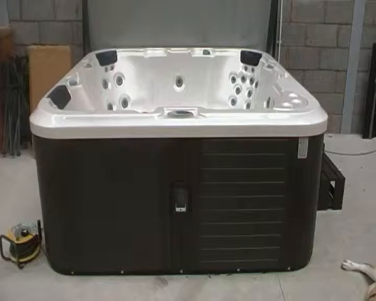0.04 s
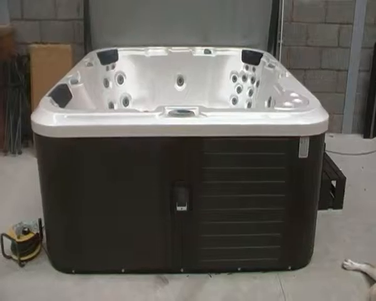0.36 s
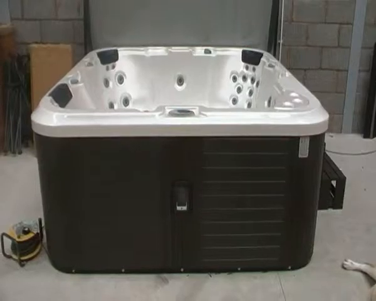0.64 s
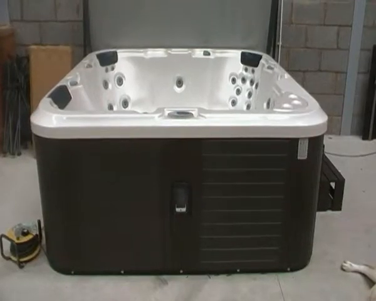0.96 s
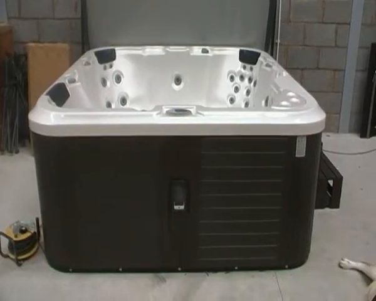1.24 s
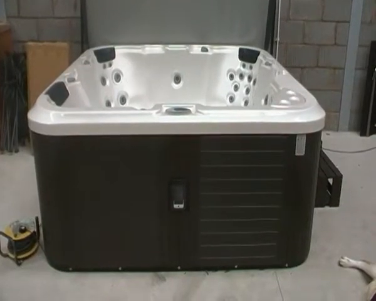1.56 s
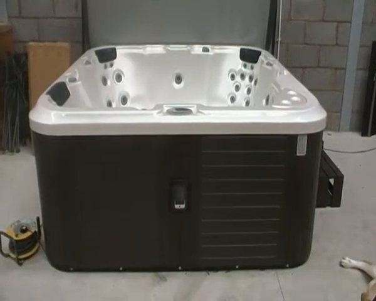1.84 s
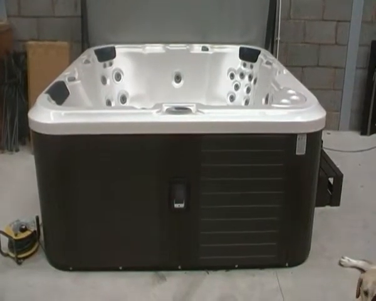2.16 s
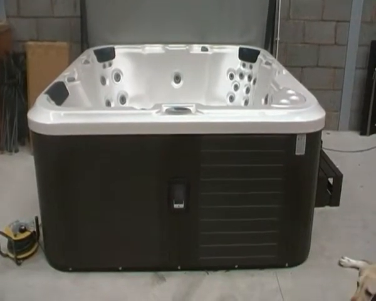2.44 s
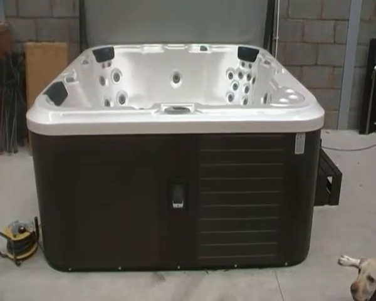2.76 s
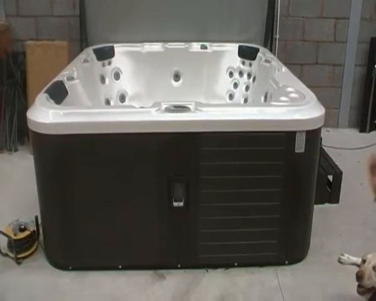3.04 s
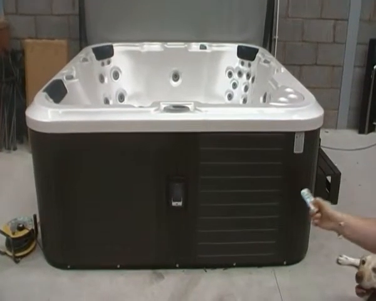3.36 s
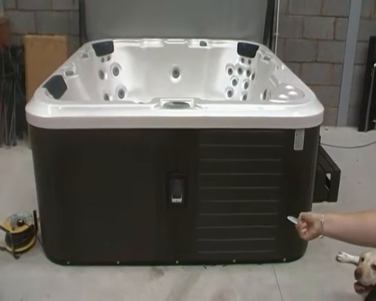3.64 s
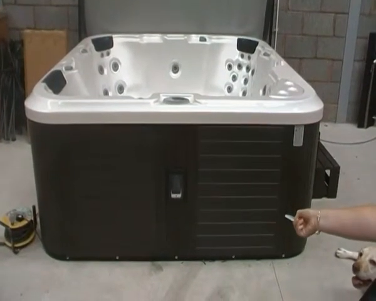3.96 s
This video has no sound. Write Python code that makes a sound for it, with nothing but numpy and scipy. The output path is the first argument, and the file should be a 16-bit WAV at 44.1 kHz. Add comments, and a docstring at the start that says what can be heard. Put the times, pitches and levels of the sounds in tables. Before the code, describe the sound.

Quiet workshop room noise starts just after the beginning and holds steady: airy hiss, a deep wavering rumble and a faint hum. A soft low bump comes at 0.5 seconds and a slight swell around 1.3. Faint ticks, light knocks and scuffs fall between 2 and 3 seconds. At about 3.4 and 3.5 seconds a small plastic object clicks twice, close by, over soft low bumps.

```python
"""A quiet workshop: moving air, a deep building rumble and a faint hum of fan and mains,
under steady microphone hiss. The sound cuts in just after the start. The low middle swells once;
soft bumps, light ringing knocks, dry ticks and scuffs come from the room. Near the end a small
plastic thing in the hand clicks twice, close by, each click a cluster of hard contacts."""
import sys
import numpy as np
from scipy import signal
from scipy.fft import rfft, irfft
from scipy.io import wavfile
from scipy.ndimage import uniform_filter1d

SR = 44100
rng = np.random.default_rng(int(sys.argv[2]) if len(sys.argv) > 2 else 0)


def log_audio(samples):
    """Write samples as a 16-bit WAV file to the path given in sys.argv[1]."""
    # one column per channel
    frames = np.atleast_2d(samples).T
    # limit to full scale, then quantise
    limited = np.clip(frames, -1, 1)
    pcm = np.round(limited * 32767).astype(np.int16)
    wavfile.write(sys.argv[1], SR, pcm)


N = 176400
TIME_S = np.arange(N) / SR
BIN_HZ = np.arange(N // 2 + 1) * SR / N


def gain(db):
    """Decibels to gain."""
    return 10 ** (np.asarray(db) / 20)


def unit_rms(x):
    """Scale to rms 1."""
    return x / np.sqrt(np.mean(x ** 2))


def wander(rate_hz):
    """Random steps, smoothed twice; spread near 1."""
    hold = int(SR / rate_hz)
    steps = np.repeat(rng.standard_normal(N // hold + 1), hold)
    return 1.31 * uniform_filter1d(uniform_filter1d(steps, hold), hold)[:N]


def shaped_noise(spectrum):
    """Noise of rms 1 shaped by (Hz, dB) points."""
    hz, db = np.array(spectrum).T
    bin_db = np.interp(np.log(np.maximum(BIN_HZ, 1)), np.log(hz), db)
    return unit_rms(irfft(rfft(rng.standard_normal(N)) * gain(bin_db), N))


def bandpass(x, low_hz, high_hz):
    """Butterworth band filter."""
    return signal.sosfilt(signal.butter(2, [low_hz, high_hz], "band", fs=SR, output="sos"), x)


def stereo(mid, side, side_db):
    """Left and right from mid and side."""
    return mid + gain(side_db) * side * np.array([[1], [-1]])


def pan_left(x, lead_db):
    """Tilt the balance to the left."""
    return x * gain([[lead_db / 2], [-lead_db / 2]])


def delay_left(x, lag_s):
    """Sound from the right reaches the left microphone late."""
    left, right = x * np.ones((2, 1))
    return np.array([irfft(rfft(left) * np.exp(-2j * np.pi * BIN_HZ * lag_s), N), right])


def burst(start_s, attack_s, decay_s, low_hz, high_hz, side_db):
    """Stereo noise band: linear rise, exponential decay."""
    age_s = TIME_S - start_s
    envelope = np.clip(age_s / attack_s, 0, 1) * np.exp(-np.maximum(age_s - attack_s, 0) / decay_s)
    mid, side = (unit_rms(bandpass(rng.standard_normal(N), low_hz, high_hz)) for _ in range(2))
    return envelope * stereo(mid, side, side_db)


def room(x, wet_db, t60_s=.3):
    """Add the short diffuse tail of the block walls."""
    tail = rng.standard_normal((2, SR)) * np.exp(-np.log(1000) * TIME_S[:SR] / t60_s)
    tail /= np.sqrt(np.sum(tail ** 2, axis=1, keepdims=True))
    return x + gain(wet_db) * signal.fftconvolve(x, tail, axes=1)[:, :N]


# Each row: frequency in Hz, relative density in dB.
AIR_SPECTRUM = [(75, -1.5), (100, -3), (125, -3), (175, -8), (240, -6.5), (360, -11.5), (470, -14),
                (600, -15), (740, -14), (900, -17), (1110, -16), (1400, -24), (2100, -27.5), (4000, -35),
                (9000, -55), (12300, -52), (13000, -85)]


def air(level_db=-48, waver_db=.5):
    """Moving room air, wavering slightly."""
    flow = stereo(shaped_noise(AIR_SPECTRUM), shaped_noise(AIR_SPECTRUM), side_db=-6)
    return gain(level_db + waver_db * wander(rate_hz=5.12)) * flow


# Each row: frequency in Hz, relative density in dB.
RUMBLE_SPECTRUM = [(6, -18.5), (14, 1.5), (23, -10), (32, 0), (41, -7), (60, -8.5), (75, -13.5), (110, -33),
                   (250, -56), (2000, -92)]
# Each row: time in seconds, level in dB.
RUMBLE_ENVELOPE = [(.12, -47), (.4, -40.5), (.54, -38.5), (.72, -42), (1.1, -40.5), (1.5, -42),
                   (2.05, -42.5), (2.3, -38.5), (2.65, -42), (2.85, -46.5), (3.1, -38), (3.27, -47.5),
                   (3.45, -39.5), (3.62, -37.5), (3.72, -46), (4, -40)]


def rumble():
    """Deep building rumble that swells and sinks, slightly left."""
    level_db = np.interp(TIME_S, *np.array(RUMBLE_ENVELOPE).T)
    deep = stereo(shaped_noise(RUMBLE_SPECTRUM), shaped_noise(RUMBLE_SPECTRUM), side_db=-6)
    return pan_left(gain(level_db) * deep, lead_db=2)


# Each row: frequency in Hz, level in dB.
HUM_TONES = [(100, -59), (200, -64.5), (409.2, -68.5), (534, -70.5), (818.3, -69), (1064, -75), (7800, -84)]


def hum(drift_ratio=.0012, waver_db=1.7):
    """Mains and fan tones, each drifting in pitch and level."""
    def tone(hz):
        cycles = np.cumsum(hz * (1 + drift_ratio * wander(rate_hz=5.98))) / SR + rng.random()
        return unit_rms(np.sin(2 * np.pi * cycles) * gain(waver_db * wander(rate_hz=4.92)))
    return sum(gain(db) * stereo(tone(hz), tone(hz), side_db=-4.5) for hz, db in HUM_TONES)


# Each row: start in seconds, level in dB.
DULL_BUMPS = [(.51, -43.5), (3.44, -42), (3.491, -49), (3.57, -51.5)]


def bumps():
    """Soft low bumps just above the rumble."""
    return sum(gain(db) * burst(start_s, attack_s=.012, decay_s=.047, low_hz=47, high_hz=93, side_db=-6)
               for start_s, db in DULL_BUMPS)


def swell(level_db=-54):
    """The low middle of the room sound swells once and settles."""
    return gain(level_db) * burst(1.11, attack_s=.19, decay_s=.29, low_hz=210, high_hz=330, side_db=-6)


def ring(start_s, hz, decay_s, attack_s=.001):
    """One light knock: a damped sine."""
    age_s = np.maximum(TIME_S - start_s, 0)
    envelope = np.minimum(age_s / attack_s, 1) * np.exp(-age_s / decay_s)
    return envelope * np.sin(2 * np.pi * hz * age_s)


def contact(start_s, low_hz, high_hz):
    """One hard contact: a band-limited impulse of peak 1."""
    pulse = bandpass(np.sinc((TIME_S - start_s) * SR), low_hz, high_hz)
    return pulse / np.max(np.abs(pulse))


# Each row: start in seconds, level in dB, ring in Hz, decay in seconds.
KNOCK_RINGS = [(2.073, -49, 1550, .004), (2.076, -50, 2250, .006), (2.508, -52, 1640, .009),
               (2.517, -50, 1720, .009), (2.519, -46, 1307, .008), (2.940, -50.5, 1990, .005)]
# Each row: start in seconds, level in dB, low and high edge in Hz.
TICK_CONTACTS = [(2.0746, -42, 1200, 2600), (2.0760, -47, 1400, 3000), (2.5032, -40, 2500, 6500),
                 (2.5245, -47, 2800, 6500), (2.9422, -52, 1600, 2600)]


def knocks_and_ticks():
    """Small things touch in the room: short rings and dry ticks."""
    rings = sum(gain(db) * ring(start_s, hz, decay_s) for start_s, db, hz, decay_s in KNOCK_RINGS)
    ticks = sum(gain(db) * contact(start_s, *band_hz) for start_s, db, *band_hz in TICK_CONTACTS)
    direct = delay_left(rings + ticks, lag_s=30e-6)
    return room(pan_left(direct, lead_db=2), wet_db=0)


# Each row: start in seconds, level in dB, attack and decay in seconds, low and high edge in Hz.
SCUFF_BURSTS = [(2.6, -65, .004, .012, 3000, 11000), (2.502, -53, 0.0015, 0.016, 1800, 4900),
                (2.495, -62, .015, 0.033, 7000, 9300), (2.865, -57, .022, 0.02, 2800, 8600),
                (2.9, -60, .006, .012, 6000, 11000)]


def scuffs():
    """Something shifts on the right with faint scuffs and rustles."""
    direct = sum(gain(db) * burst(start_s, *shape, side_db=-4) for start_s, db, *shape in SCUFF_BURSTS)
    return room(delay_left(direct, lag_s=30e-6), wet_db=-1)


# Each row: start in seconds, level in dB, low and high edge in Hz.
CLICK_CONTACTS = [(3.3996, -38.5, 8000, 11800), (3.4004, -35, 8000, 10500), (3.4031, -31.5, 8200, 12300),
                  (3.4773, -29, 7200, 10500), (3.4773, -27, 6000, 11000), (3.4775, -38, 3800, 6000),
                  (3.4781, -35, 4000, 9000), (3.485, -38, 6500, 9500), (3.4850, -39, 4500, 9000),
                  (3.4861, -37.5, 6800, 10000)]


def plastic_clicks(rub_db=-44):
    """Two clusters of bright contacts on the right; the plastic rubs during the second."""
    contacts = sum(gain(db) * contact(start_s, *band_hz) for start_s, db, *band_hz in CLICK_CONTACTS)
    rub = burst(3.4775, attack_s=.002, decay_s=.0075, low_hz=6500, high_hz=11700, side_db=-4)
    return room(delay_left(contacts + gain(rub_db) * rub, lag_s=50e-6), wet_db=-7)


def scene():
    """The steady room and its few small sounds."""
    return air() + rumble() + hum() + bumps() + swell() + knocks_and_ticks() + scuffs() + plastic_clicks()


# Each row: frequency in Hz, relative density in dB.
HISS_SPECTRUM = [(200, 5), (1500, 3), (3000, 2), (5000, 1.5), (8000, 0.94), (10800, 0), (11600, -5),
                 (12400, -13), (12700, -35), (13000, -60)]


def record(dry, hiss_db=-56.5, unmute_s=.1155, cutoff_hz=13400):
    """The recorder adds microphone hiss, unmutes just after the start and cuts the top."""
    hiss = gain(hiss_db) * stereo(shaped_noise(HISS_SPECTRUM), shaped_noise(HISS_SPECTRUM), side_db=-1)
    gate = TIME_S >= unmute_s
    lowpass = signal.ellip(8, .1, 50, cutoff_hz, fs=SR, output="sos")
    return signal.sosfiltfilt(lowpass, gate * (dry + hiss))


dry = scene()
out = record(dry)
log_audio(out)
```